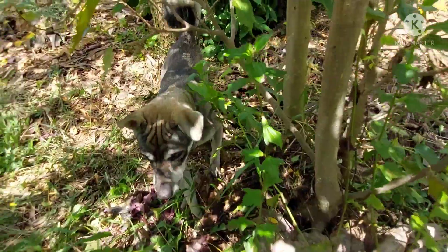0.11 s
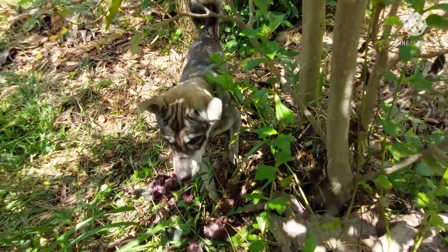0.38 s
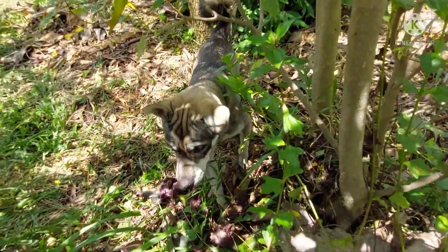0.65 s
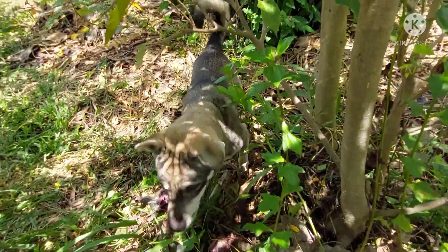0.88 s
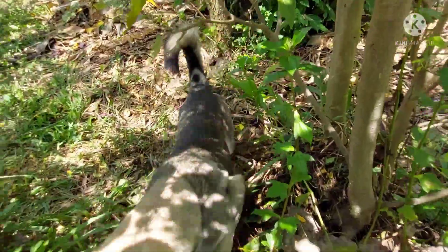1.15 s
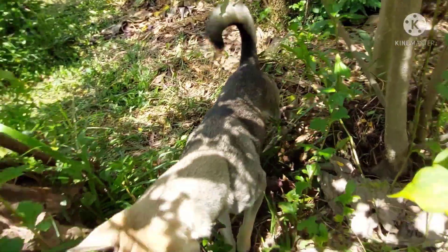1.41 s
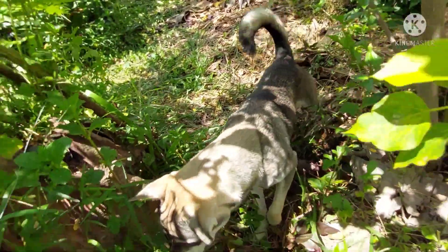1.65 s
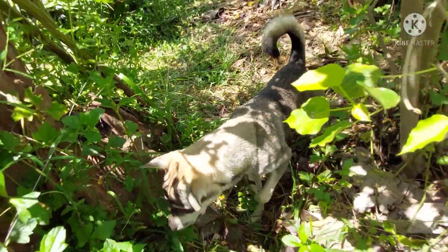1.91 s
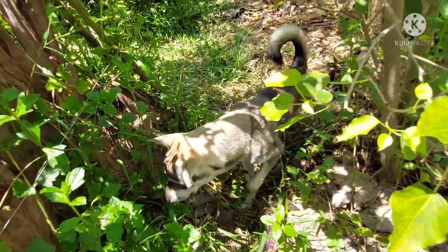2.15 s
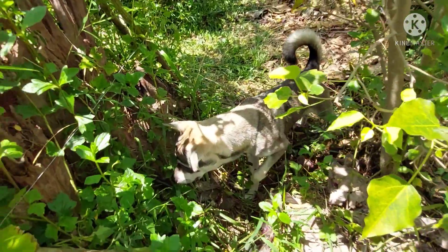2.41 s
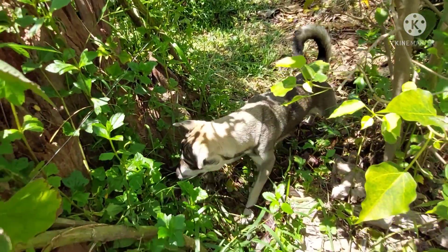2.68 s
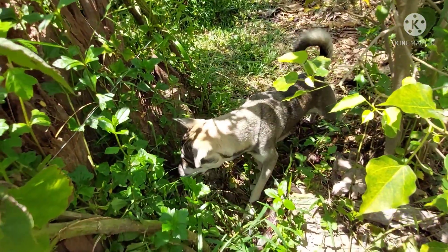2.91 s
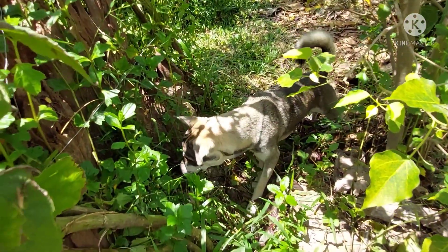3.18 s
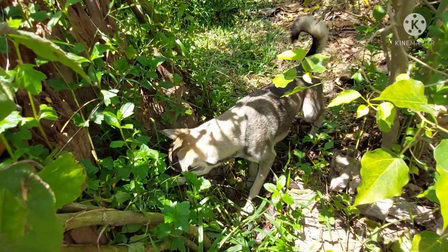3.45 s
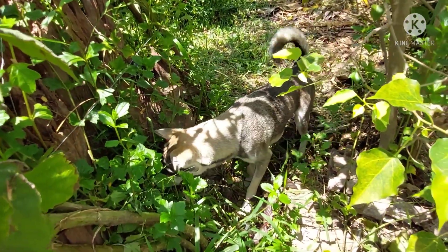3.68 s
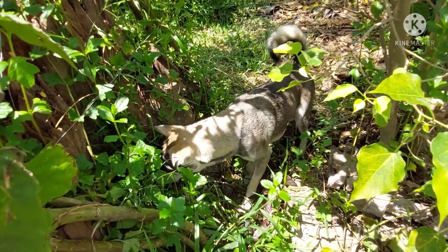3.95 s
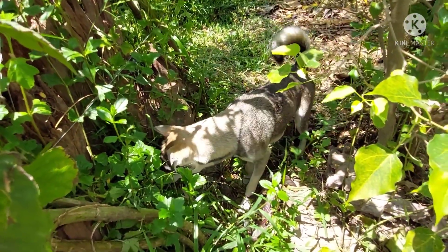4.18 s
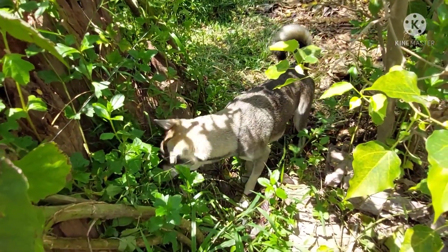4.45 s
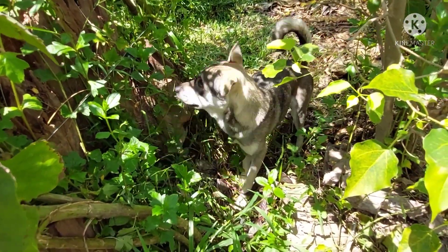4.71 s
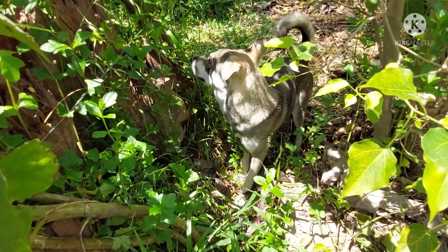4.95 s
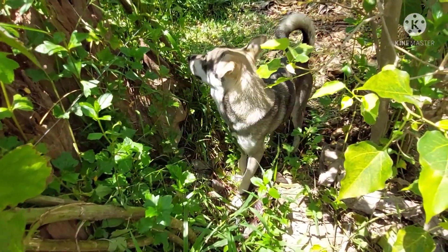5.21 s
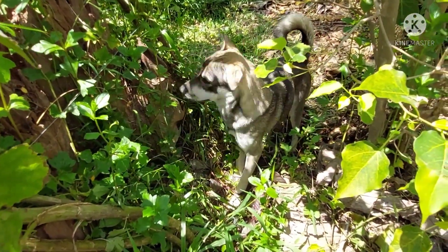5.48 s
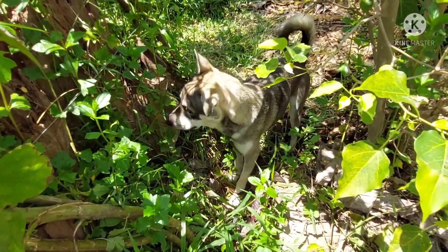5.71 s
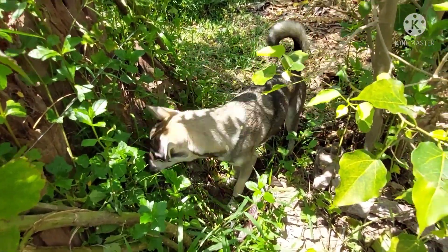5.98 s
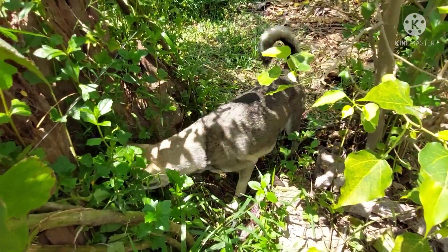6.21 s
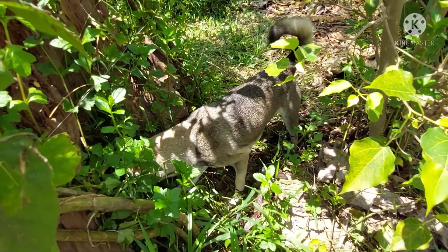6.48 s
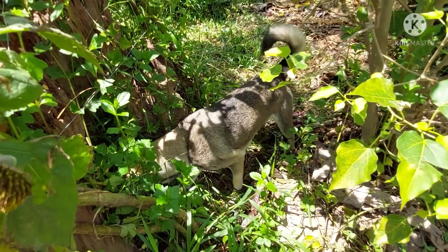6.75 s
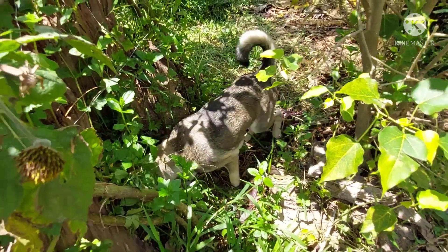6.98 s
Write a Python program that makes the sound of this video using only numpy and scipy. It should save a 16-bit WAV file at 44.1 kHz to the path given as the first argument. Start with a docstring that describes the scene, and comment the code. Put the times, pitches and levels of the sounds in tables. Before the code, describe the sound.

A dog moves through dry leaf litter outdoors, heard close and dry in wide stereo. From 0 to 0.8 s there is only very faint, fine rustling and a couple of tiny ticks. At 0.8 s leaves crackle lightly, building to a loud dense crunch at 1.1-1.25 s, with sharp woody snaps and short dull paw thuds; this is much the loudest event. It settles quickly, with a softer step near 1.65 s. Quiet rustles and soft brushing follow at 2.2-2.5 s, a small snapping step at 2.7 s, then a brisk crunch at 3.4 s and a cluster of twig ticks at 3.5-4 s. Light, crisp crackles continue around 4.3-5 s, thinning to near quiet. Small ticks from 6 s lead to a firmer crunch, swish and low thud at 6.3-6.4 s, then faint stirring to 7.1 s. Faint air and a distant fuzzy low hum lie beneath.

```python
"""Dry leaf litter crackles as a young dog steps and noses through a grove, close to two spaced microphones.
Each move shapes a dense train of tiny breaks that rings crisp leaves and a duller bed below.
Single breaks make the snaps, decaying sines the paw thuds, gliding bands of noise the swishes of fur.
A far drone of two fuzzy hums and faint wide air noise lie under it."""
import sys
import numpy as np
from scipy import signal
from scipy.fft import rfft, irfft
from scipy.io import wavfile
from scipy.ndimage import uniform_filter1d

SR = 44100
rng = np.random.default_rng(int(sys.argv[2]) if len(sys.argv) > 2 else 0)


def dump(signal):
    """Clip the signal to [-1, 1] and save it as 16-bit WAV at the path in sys.argv[1]."""
    limited = np.clip(np.atleast_2d(signal).T, -1, 1)
    pcm = np.round(limited * 32767).astype(np.int16)
    wavfile.write(sys.argv[1], SR, pcm)


def voltage_ratio(level):
    """Linear amplitude factor for a level in decibels (scalar or array-like)."""
    return 10 ** (np.asarray(level, float) / 20)


N = 313992  # samples

# spectrum of crisp leaves: freq_hz, relative_db
LEAF = [(300, -54), (1200, -34), (2500, -9), (4000, 2.5), (6000, -2), (8500, -2.5), (11000, 2), (14000, 1),
        (15800, -3.5)]
# spectrum of the bed and of woody snaps: freq_hz, relative_db
BED = [(150, -12), (400, -11), (800, -7), (1100, -6), (1700, -3), (2300, -2), (3300, -3.5), (5000, -20)]


def evened(x):
    """Scales to rms 1."""
    return x / np.sqrt(np.mean(x ** 2) + 1e-20)


def read(points, hz):
    """Interpolates a table on a log-frequency axis."""
    f, value = np.transpose(points)
    return np.interp(np.log(hz + 1), np.log(f + 1), value)


def curves(rows):
    """Interpolates every column of a time table at every sample."""
    s, *columns = np.transpose(rows)
    return [np.interp(np.arange(N) / SR, s, c) for c in columns]


def colour(points):
    """Minimum-phase filter of energy 1 with the given spectrum shape."""
    log_gain = read(points, np.fft.rfftfreq(2048, 1 / SR)) * np.log(10) / 20
    circle = np.concatenate([log_gain, log_gain[-2:0:-1]])
    taps = np.fft.ifft(np.exp(np.conj(signal.hilbert(circle)))).real[:1024]
    return taps / np.linalg.norm(taps)


def sides(pan_db):
    """Left and right gains for a left-right level difference."""
    return voltage_ratio(np.array([pan_db / 2, -pan_db / 2]))


def crack(lag_samples, t60_s, scatter_db, common):
    """One break at both microphones: a click, later on one side, then scatter from the leaves around."""
    t = np.arange(3000) / SR
    shared, *own = rng.standard_normal((3, 3000))
    out = common * shared + np.sqrt(1 - common ** 2) * np.array(own)
    near_and_far = voltage_ratio(-60 * t / t60_s) + voltage_ratio(-15.0 - 60 * t / 0.17)
    out *= voltage_ratio(scatter_db) * near_and_far * (1 - np.exp(-t / 0.00042))
    out[:, 0] += 1  # the click
    later = int(lag_samples > 0)  # 0 left, 1 right
    out[later] = np.roll(out[later], abs(lag_samples))
    return out / np.linalg.norm(out[0])


def air():
    """Faint wide noise with drifting patches, alike on both sides only in the bass."""
    # noise spectrum: freq_hz, relative_db_per_hz
    spectrum = [(15, -41.5), (25, -12), (59, -3.5), (120, -3), (190, -13), (256, -9.5), (384, -21.5),
                (962, -31.5), (2840, -38), (3160, -63), (12500, -39.5), (14800, -45), (16000, -29.5)]
    # likeness of the sides: freq_hz, correlation
    likeness = [(40, 1), (130, 0.2), (300, 0.18), (700, 0.21), (2000, 0.04)]
    # balance: freq_hz, left_right_db
    balance = [(60, 7), (240, 10), (950, 4.5), (3770, -1.5), (15000, -3)]
    # slow fade, with the drone: time_s, gain_db
    fade = [(0, 0), (4.5, 0.5), (5.3, -2), (7.12, 0)]
    level_db, patch_db = -59, 2.0
    frames, hz = (N // 256 + 5) // 2, np.fft.rfftfreq(2048, 1 / SR)
    a, b, c, d, patches = rng.standard_normal((frames, 1025, 5)).T
    patches = evened(uniform_filter1d(uniform_filter1d(patches, 20, 0), 8, 1))
    same = read(likeness, hz)[:, None]
    left = a + 1j * b
    right = same * left + np.sqrt(1 - same ** 2) * (c + 1j * d)
    z = np.array([left, right])
    z *= voltage_ratio(read(spectrum, hz)[:, None] + patch_db * patches)
    z *= sides(read(balance, hz))[:, :, None]
    noise = signal.istft(z, nperseg=2048, noverlap=1536)[1][:, :N]
    return voltage_ratio(level_db + curves(fade)[0]) * evened(noise)


def drone():
    """Two fuzzy low hums, narrow bands of noise that swell and fade, nearly the same on both sides."""
    # swell: time_s, low_hum_db, upper_over_low_db
    swell = [(0.0, -60.5, 0.5), (0.65, -56.5, -3.5), (1.3, -58.5, 6.5), (2.0, -58.5, 0), (3.6, -58, -1),
             (4.0, -62, -5.5), (4.25, -52.5, -10.5), (5.1, -68.5, -6.5), (5.6, -57.5, -7.5),
             (5.9, -70.5, -4.5), (7.12, -65, -4.5)]
    # low and upper hum: centre_hz, half_amplitude_width_hz
    hums = [(56, 16), (103, 39)]
    low_db, upper_over_low_db = curves(swell)
    out, hz = np.zeros((2, N)), np.fft.rfftfreq(N, 1 / SR)
    for (centre_hz, width_hz), db in zip(hums, (low_db, low_db + upper_over_low_db)):
        noise = rng.standard_normal((3, N))
        peak = 1 / (1 + (2 * (hz - centre_hz) / width_hz) ** 2)
        hum = irfft(rfft(noise[0] + 0.36 * noise[1:]) * peak, N)
        out += voltage_ratio(db) * evened(hum)
    return out


def swishes():
    """Fur dragging along stems: noise around one gliding resonance, swelling and stopping."""
    # start_s, end_s, level_db (before the taper), start_hz, end_hz, width_hz (of each of two poles)
    drags = [(0.022, 0.23, -71.5, 3700, 3540, 1210), (0.833, 0.982, -60.5, 500, 476, 247),
             (1.941, 2.077, -75, 2590, 2610, 584), (2.266, 2.46, -61, 1970, 1510, 1100),
             (2.42, 2.525, -59, 1530, 1250, 704), (4.518, 4.569, -60, 2440, 2350, 700),
             (6.349, 6.418, -44.5, 1600, 1630, 590)]
    out = np.zeros((2, N))
    for start_s, end_s, level_db, start_hz, end_hz, width_hz in drags:
        n = round((end_s - start_s) * SR)
        turn = np.exp(2j * np.pi * np.cumsum(np.linspace(start_hz, end_hz, n)) / SR)
        r = np.exp(-np.pi * width_hz / SR)
        noise = rng.standard_normal((3, round(0.4 * SR)))[:, :n]
        both = noise[0] + min(start_hz / 2500, 1) * noise[1:]  # higher swishes are less alike
        # shift the centre to 0 Hz, low-pass, shift back
        band = signal.lfilter([1], np.convolve([1, -r], [1, -r]), both / turn) * turn
        swish = evened(band.real) * signal.windows.tukey(n, 0.6)
        out[:, round(start_s * SR):][:, :n] += voltage_ratio(level_db) * swish
    return out


def thuds():
    """Paws on soft ground: a push rings it briefly, its pitch roughened by the loose soil."""
    # start_s, level_db (before onset and decay), pitch_hz (before wobble), t60_s
    landings = [(1.11, -34.5, 439, 0.23), (1.134, -24, 447, 0.05), (1.179, -39, 302, 0.16),
                (1.248, -43, 103.5, 0.35), (1.341, -47, 106, 0.25), (1.691, -40, 99.3, 0.22),
                (6.391, -42.5, 258, 0.14), (6.403, -35, 126, 0.095)]
    out, t = np.zeros(N + SR), np.arange(SR // 2) / SR
    for start_s, level_db, pitch_hz, t60_s in landings:
        wobble = 1 + 0.16 * evened(uniform_filter1d(rng.standard_normal(len(t)), 200))
        ring = np.sin(2 * np.pi * pitch_hz * np.cumsum(wobble) / SR)
        envelope = voltage_ratio(level_db - 60 * t / t60_s) * (1 - np.exp(-t / 0.0004))
        out[round(start_s * SR):][:len(t)] += envelope * ring
    return out[:N]


def snaps():
    """Leaf stems and twigs snap: each one sharp break with its own mix of crisp and woody colour."""
    # start_s, level_db (first 3 ms of the break, before colouring), wood_db (gain of the woody part), left_right_db
    breaks = [(0.4606, -62, -20, 5), (0.478, -61.5, -21, 1), (0.772, -66, -24, -5), (0.797, -60, -11, -3),
              (0.8305, -53, -5, 6), (1.012, -42, -9.5, 1.5), (1.0983, -34.5, 0.5, -1),
              (1.1321, -28.5, -1, 0.5), (1.162, -25.5, -15, 2.5), (1.1787, -22, -2.5, 0),
              (1.1856, -26, 4, -10), (1.2284, -36.5, 0.5, 0), (1.3054, -46, -25, -5), (1.56, -50, -18, 1.5),
              (1.6333, -56, 0, 0), (1.7632, -55, -10.5, -6), (2.2267, -62, 4, -2.5),
              (2.6354, -61, -25.5, -2), (2.6846, -54.5, -12.5, -4), (2.7165, -44.5, -1, 3.5),
              (2.848, -59, -1.5, -3.5), (3.138, -59, -21.5, 4.5), (3.3323, -56, -3.5, -2.5),
              (3.527, -47.5, -5, 1), (3.681, -42.5, -2.5, 1), (3.719, -45, -2.5, -6),
              (3.7364, -44, -3.5, 3), (3.7656, -50, -7.5, -3), (3.86, -61, -24, -1), (3.8803, -51, -28, 3),
              (3.9065, -45, -20.5, 1), (3.992, -53.5, -33, -3), (4.27, -51.5, -9.5, 0.5),
              (4.361, -48.5, -21, -2), (4.465, -48, -20, -11), (4.867, -61.5, -12.5, -2.5),
              (4.96, -51.5, -35.5, 2.5), (5.0002, -56.5, -28.5, 6.5), (5.1507, -60, -14, -1.5),
              (5.26, -71.5, -14, 1), (5.437, -65, -21.5, -4), (5.5304, -55, -17.5, -5),
              (5.58, -64, -23, -9), (5.718, -65.5, -14.5, -6), (5.744, -67, -18.5, 1),
              (5.8149, -66, -4, -2), (6.019, -63.5, 2, -3), (6.1036, -53, -3, 2.5), (6.1573, -52, -27, 9),
              (6.356, -38.5, -1, -3.5), (6.392, -44, -1.5, -2), (6.816, -55.5, -24, -6.5)]
    out, leaf, wood = np.zeros((2, N + 6000)), colour(LEAF), colour(BED)
    for start_s, level_db, wood_db, pan_db in breaks:
        one = crack(round(-pan_db / 2), 0.0067, -8.5, 0.36)
        one /= np.sqrt(np.mean(one[:, :SR * 3 // 1000] ** 2))
        # the less wood, the thinner and higher the tick
        thin = colour([(4000, 0.5 * min(wood_db, 0)), (9000, 0)])
        crisp = np.convolve(leaf, thin)[:len(wood)]
        crisp_part = signal.fftconvolve(one, crisp[None], axes=1) * sides(pan_db)[:, None]
        woody_part = np.convolve(one[0], wood) * sides(0.34 * pan_db)[:, None]
        snap = crisp_part + voltage_ratio(wood_db) * woody_part
        out[:, round(start_s * SR):][:, :snap.shape[1]] += voltage_ratio(level_db) * snap
    return out[:, :N]


def one_leaf(spread_db):
    """No two leaves sound alike: a filter of random broad bumps."""
    bumps_hz = (1000, 2500, 4500, 7000, 10000, 13000, 16000)
    return colour([(hz, spread_db * rng.standard_normal()) for hz in bumps_hz])[None]


def movement():
    """Gains of the crisp leaves and of the bed: every move of paws or nose swells, holds, falls and settles."""
    # moves: full_strength_s, rise_s, hold_s, leaf_db, weight_db (pressed into the bed, over the leaves)
    moves = [(0.0, 0.038, .25, -64, -9), (0.465, 0.05, .01, -71.5, -7), (0.836, 0.018, 0.059, -48.5, -4.5),
             (0.987, 0.1, .02, -56, -12), (1.063, 0.07, 0.018, -46, -4.5), (1.104, 0.0075, 0.036, -34, 0.5),
             (1.163, 0.021, 0.05, -27, -6), (1.656, 0.016, 0.026, -47, -4.5),
             (1.769, 0.068, 0.016, -55, -10), (2.172, 0.069, 0.039, -69.5, -9.5),
             (2.322, 0.092, 0.089, -57, -6), (2.463, 0.059, .02, -61.5, -2.5),
             (2.691, 0.0081, .01, -49.5, -7), (2.72, 0.018, 0.0063, -41, -3.5),
             (2.9, 0.045, 0.04, -66.5, -11), (3.137, 0.025, 0.0058, -76, -14.5),
             (3.433, 0.039, 0.017, -40.5, -5), (3.54, 0.038, 0.032, -56.5, -13),
             (3.661, 0.037, .005, -47, -3.5), (3.725, 0.013, 0.0081, -54, -7),
             (3.9, 0.0083, .03, -59.5, -23), (3.99, 0.035, .005, -60, -12.5),
             (4.083, 0.022, .12, -62.5, -14.5), (4.258, 0.063, 0.12, -57, -16),
             (4.497, 0.073, 0.022, -48.5, -16), (4.704, 0.077, 0.011, -57, -10),
             (4.971, 0.027, 0.014, -61, -12.5), (5.15, .02, 0.025, -72.5, -18),
             (5.597, 0.035, .005, -62.5, -15.5), (6.009, .04, 0.028, -65.5, -7),
             (6.097, 0.033, .005, -54, -6.5), (6.157, 0.011, 0.0043, -53.5, -7.5),
             (6.225, 0.015, .03, -53, -7), (6.301, 0.02, 0.012, -42.5, -4.5),
             (6.357, 0.0044, 0.034, -39, -5), (6.668, .03, 0.015, -66.5, -8),
             (6.982, 0.054, .01, -60, -7.5), (7.061, .02, 0.014, -64.5, -13.5)]
    # faint stirring between the moves: time_s, leaf_db
    stir = [(0, -74), (.7, -78.5), (1.5, -67), (2.0, -73.5), (2.6, -75.5), (3.1, -84.5), (3.8, -73),
            (4.6, -73), (5.1, -75), (5.5, -81), (5.9, -74.5), (6.55, -65.5), (6.8, -68), (7.12, -63)]
    stir_weight_db = -16
    fall_s, fall_per_rise = 0.023, 0.36  # a gentle move also dies away gently
    settle_db, settle_s = -12.5, 0.12  # bent leaves spring back
    t = np.arange(N // 16 + 2) * 16 / SR
    leaves = voltage_ratio(np.interp(t, *np.transpose(stir))) ** 2
    bed = leaves * voltage_ratio(stir_weight_db) ** 2
    for full_s, rise_s, hold_s, leaf_db, weight_db in moves:
        after = np.maximum(t - full_s - hold_s, 0)
        drop = np.exp(-after / (fall_s + fall_per_rise * rise_s))
        settle = voltage_ratio(settle_db) * np.exp(-after / settle_s)
        swell = np.exp(np.minimum(t - full_s, 0) / rise_s)
        power = (voltage_ratio(leaf_db) * swell * np.maximum(drop, settle)) ** 2
        leaves = leaves + power
        bed = bed + power * voltage_ratio(weight_db) ** 2
    return [np.interp(np.arange(N) / SR, t, np.sqrt(p)) for p in (leaves, bed)]


def litter():
    """Dense random breaks ring both the crisp leaves and the duller bed below them."""
    breaks_per_s, spots = 3000, 12
    thin_hz, thin_share = 7000, 0.25
    leaf_gain, bed_gain = movement()
    size = voltage_ratio(3.1 * np.minimum(rng.exponential(1, N), 5))
    size *= (rng.random(N) < breaks_per_s / SR) * rng.choice([-1, 1], N)
    spot, leaves, bed = rng.integers(0, spots, N), np.zeros((2, N)), np.zeros((2, N))
    for k in range(spots):
        bunches = evened(uniform_filter1d(rng.standard_normal(N), 900))  # a leaf crumples in short spells
        train = (size * voltage_ratio(3.73 * bunches) * (spot == k))[None]
        lag_samples = k - 2  # most spots reach one side a few samples first
        crisp = signal.fftconvolve(crack(lag_samples, 0.05, -16.5, 0.29), one_leaf(3.8), axes=1)
        leaves += signal.oaconvolve(train, crisp, axes=1)[:, :N]
        bed += signal.oaconvolve(train, crack(lag_samples, 0.029, -13.5, 0.91), axes=1)[:, :N]
    leaves = signal.oaconvolve(leaves, colour(LEAF)[None], axes=1)[:, :N]
    leaves = evened(leaves) * sides(0.4)[:, None]
    bed = signal.oaconvolve(bed, colour(BED)[None], axes=1)[:, :N]
    bed = evened(bed) * sides(-2.5)[:, None]
    # light moves stir only small leaves: their lower crackle drops by a share of the weight dB
    lower = signal.sosfilt(signal.butter(N=2, Wn=thin_hz, fs=SR, output="sos"), leaves)
    leaves = leaves - (1 - np.minimum(bed_gain / leaf_gain, 1) ** thin_share) * lower
    return leaf_gain * evened(leaves) + bed_gain * bed


def scene():
    """All sources, outdoors and dry."""
    return litter() + snaps() + swishes() + thuds() + air() + drone()


def roll_off(x):
    """The treble ends steeply here."""
    return signal.sosfilt(signal.butter(12, 16470, fs=SR, output="sos"), x)


def record(dry):
    """The microphones lose the deepest bass and the top treble."""
    bass_cut = signal.butter(N=3, Wn=40, btype="high", fs=SR, output="sos")
    treble_cut = signal.firwin(511, 15780, window=("kaiser", 8), fs=SR)
    mix = signal.oaconvolve(signal.sosfilt(bass_cut, dry), treble_cut[None], "same")
    return roll_off(mix)


dry = scene()
out = record(dry)
dump(out)
```